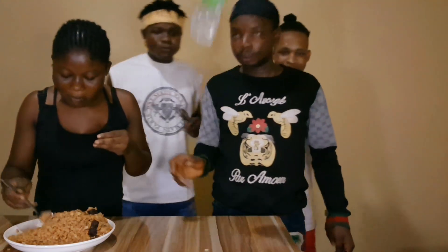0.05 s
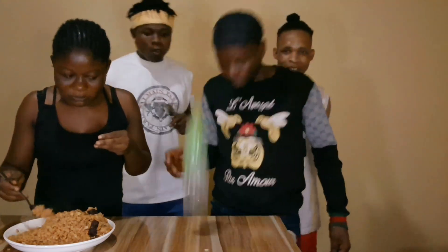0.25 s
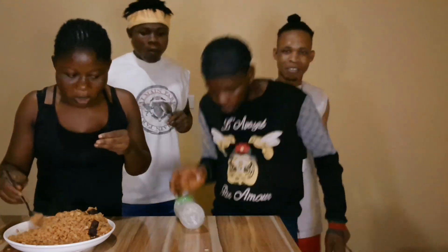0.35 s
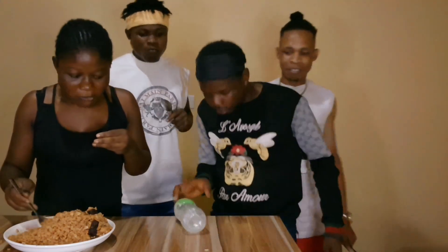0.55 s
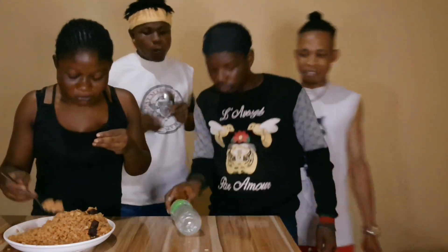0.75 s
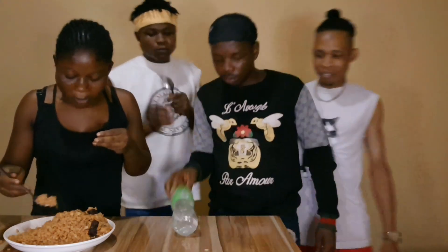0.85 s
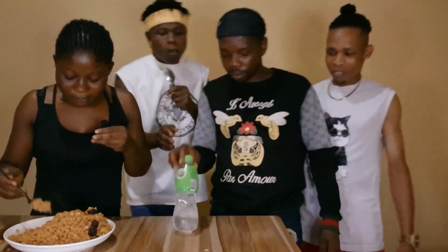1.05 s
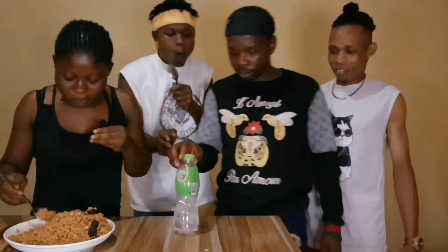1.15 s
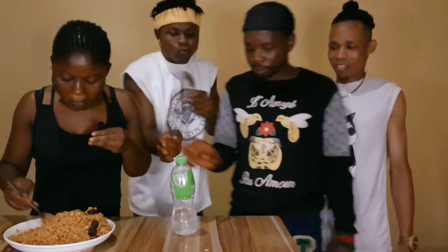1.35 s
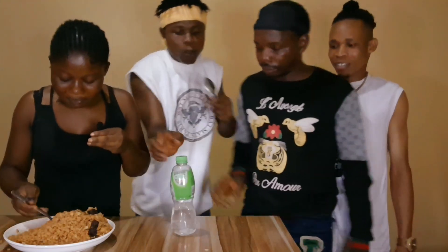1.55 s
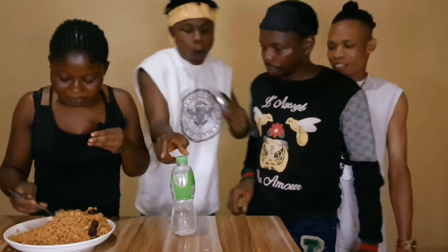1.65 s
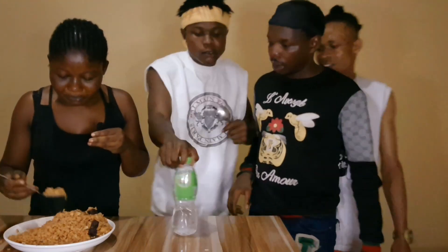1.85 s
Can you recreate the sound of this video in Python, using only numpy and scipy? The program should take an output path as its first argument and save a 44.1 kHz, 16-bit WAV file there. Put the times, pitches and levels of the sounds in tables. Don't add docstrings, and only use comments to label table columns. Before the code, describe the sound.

Plastic bottle lands with a hard cracking thud on a wooden tabletop, then softer bumps and light taps

```python
import sys
import numpy as np
from scipy import signal
from scipy.fft import rfft, irfft
from scipy.io import wavfile

SR = 44100
rng = np.random.default_rng(int(sys.argv[2]) if len(sys.argv) > 2 else 0)


def put_to_file(sound):
    columns = np.atleast_2d(sound).T
    safe = np.clip(columns, -1, 1)
    whole_steps = np.round(safe * 32767)
    wavfile.write(sys.argv[1], SR, whole_steps.astype(np.int16))


def ratio(d):
    e = np.asarray(d, float) / 20
    return 10 ** e


N = 83790
T = np.arange(N) / SR
F = np.maximum(np.fft.rfftfreq(N, 1 / SR), 1)


def level(x, db):
    return x * ratio(db) / np.sqrt(np.mean(x ** 2))


def curve(table):
    hz = [row[0] for row in table]
    values = [row[1] for row in table]
    return np.interp(np.log(F), np.log(hz), values)


def pan(db):
    return ratio(np.array([[db], [-db]]) / 2)


# pitch_hz, likeness (0-1)
LIKENESS = [(60, 1), (250, 0.87), (600, 0.5), (1200, 0.1), (4000, 0), (12000, .05)]


def noise(gain):
    like = np.clip(curve(LIKENESS), 0, 1)
    white = rfft(rng.standard_normal((2, N)))
    mid, side = white * gain * np.sqrt([1 + like, 1 - like])
    return irfft(np.array([mid + side, mid - side]), N) * pan(0.27)


def hump(hz, octaves):
    return np.exp(-2 * (np.log2(F / hz) / octaves) ** 2)


def walk(rate_hz):
    spectrum = rfft(rng.standard_normal(N)) * np.exp(-(F / rate_hz) ** 2)
    return level(irfft(spectrum, N), 0)


def ring(modes, start_s):
    t = np.maximum(T - start_s, 0)
    rise = 1 - np.exp(-t / 0.00025)
    total = 0
    for k, (hz, db, t60) in enumerate(modes):
        total = total + (-1) ** k * ratio(db - 60 * t / t60) * np.sin(2 * np.pi * hz * t)
    return rise * total


# pitch_hz, density_db (per Hz)
AIR = [(18, -57), (30, -10.5), (58, -7.5), (103, -2), (145, -15), (554, -21), (937, -30.5), (1220, -29.5),
       (16000, -44.5)]
# pitch_hz, width_hz, level_db
HUM = [(91, 5.3, -59.5), (182.4, 22, -62.5), (281, 12, -72.5), (346.2, 5.9, -68)]


def air():
    tone = 0
    for hz in 30 * 2. ** np.arange(10):
        tone = tone + noise(ratio(curve(AIR)) * hump(hz, 1)) * ratio(1.3 * walk(4))
    hum = sum(level(noise(1 / (1 + ((F - hz) / width) ** 4)), db) for hz, width, db in HUM)
    return level(tone, -56) + hum


# start_s, length_s,
# level_db, centre_hz, width_octaves
RUSTLES = [(0.094, .12, -69.5, 6480, 1.34), (0.492, 0.11, -64.5, 4880, 0.11),
           (0.643, 0.023, -63, 7800, 0.22), (0.874, 0.11, -64.5, 630, 3.7), (0.93, .12, -69, 1260, 0.26),
           (1.017, 0.1, -65.5, 3740, 2.8), (1.292, .18, -64.5, 3370, 1.8), (1.44, 0.0593, -68, 10700, 1.5),
           (1.6, .04, -70.5, 4080, 3), (1.752, .2, -67.5, 1200, 3.54), (0.447, 0.24, -63, 3600, 2.07),
           (0.706, 0.123, -67, 3770, 2.2), (1.391, .03, -65.5, 4700, 0.38), (0.32, 0.088, -43.5, 46.5, 1.4),
           (1.09, 0.067, -51, 42.3, 0.69), (1.326, .14, -62, 49, .8), (0.107, 0.11, -66.5, 2040, 1.6),
           (1.029, 0.11, -64, 990, 3), (1.19, 0.074, -65, 693, 1.6), (1.723, 0.107, -63.5, 395, 0.39)]


def rustles():
    total = 0
    for start, length, db, hz, width in RUSTLES:
        rise = 1 + np.tanh((T - start) / 0.0054)
        fall = 1 - np.tanh((T - start - length) / 0.01)
        friction = noise(hump(hz, width)) * ratio(1.2 * walk(90))
        total = total + level(friction, db) * 0.33 * rise * fall
    return total


# start_s, peak_db, pitch_hz
TICKS = [(0.1018, -46, 8000), (0.643, -36.5, 7060), (0.655, -60.5, 8000), (0.71, -50, 7640),
         (.729, -45.5, 8320), (0.741, -51, 14500), (0.786, -52, 7500), (1.385, -48, 13000),
         (1.404, -40.5, 4900), (1.4049, -41.5, 8420), (1.427, -50, 3780), (1.446, -51, 13000),
         (1.464, -51, 8400), (1.469, -43.5, 8000), (1.4695, -38.5, 13000), (1.481, -44.5, 8000),
         (1.1872, -47.5, 3220), (1.2615, -53, 3000), (1.279, -50, 3300)]


def ticks():
    t60_s = 0.003
    return sum(ring([(hz, db, t60_s), (1.25 * hz, db - 10, t60_s)], start) for start, db, hz in TICKS)


# centre_hz, level_db, t60_s
ROOM = [(112.3, -19, 1), (250, -4, 0.61), (509, 0.5, 0.54), (1170, -6, 0.56), (2110, -5, 0.42),
        (3510, -6.5, 0.49), (5050, -19, 0.34), (7800, -15.5, 0.4), (12300, -26, 0.2), (15500, -27, .42)]


def room(x):
    t = T - 0.0018
    tail = sum(level(noise(hump(hz, 0.93)), db) * ratio(-60 * t / t60) for hz, db, t60 in ROOM)
    tail = tail * np.clip(t / 0.0021, 0, 1) * ratio(-13)
    return signal.fftconvolve(x[None], tail, axes=1)[:, :N]


# start_s, blow_db, crack_db, contact_ms
BLOWS = [
    (.2098, -7, -6.5, 0.81),
    (.221, -14, -25.5, 1.17),
    (0.314, -12, -38, 3.9),
    (0.346, -13.5, -57, 4),
    (.432, -14.5, -42, 4.83),
    (.475, -24, -54, 4.15),
]
# pitch_hz, level_db, t60_s
TABLE = [(121.9, -4, 0.2), (170.7, -5, 0.18), (230, -9, 0.2), (258, -12, 0.2), (420, -2, 0.26),
         (458, -8, 0.19), (528, -3.5, 0.15), (618.7, 2.5, 0.18), (744.5, 3, 0.0785), (778.3, -6.5, 0.16),
         (941, -21, 0.27), (1200, -4.5, 0.036), (1873, 7.5, 0.057)]
# pitch_hz, level_db, t60_s
WALL = [(679, 1, 0.026), (1417, -12, 0.02), (3284, 1, 0.0088), (4052, -6, 0.0041), (4750, -12.5, .01),
        (7500, -1, 0.0046), (12500, -19, .005)]


def blows():
    push, snap = np.zeros(N), np.zeros(N)
    for start, blow_db, crack_db, contact_ms in BLOWS:
        shape = np.sin(np.pi * np.clip((T - start) / (contact_ms / 1000), 0, 1)) ** 2
        push += ratio(blow_db) * shape / shape.sum()
        snap[int(start * SR)] += ratio(crack_db)
    table = signal.fftconvolve(push, ring(TABLE, 0) / 3)[:N]
    wall = -signal.fftconvolve(snap, ring(WALL, 0))[:N]
    return table, wall, snap


# centre_hz, level_db, t60_s, width_octaves
SHIVER = [(3300, -26.5, 0.12, 0.14), (4600, -31.5, 0.096, 0.27), (8000, -34, 0.11, 0.23)]


def shiver():
    t = T - BLOWS[0][0]
    total = 0
    for hz, db, t60, width in SHIVER:
        total = total + level(noise(hump(hz, width)), db) * ratio(-60 * np.maximum(t, 0) / t60)
    return (t > 0) * total


# start_s, level_db, tilt_db (per octave)
TAPS = [
    (1.188, -41.5, -5.5),
    (1.261, -43, -4.5),
    (1.321, -44, 4.5),
]
# pitch_hz, level_db, t60_s
BASE = [(480, -2.5, 0.083), (780, -9, 0.044), (890, -10.5, 0.043), (1243, -8.5, 0.018)]


def taps():
    total = 0
    for start, db, tilt in TAPS:
        modes = [(hz, db + mode_db + tilt * np.log2(hz / 500), t60) for hz, mode_db, t60 in BASE]
        total = total + ring(modes, start)
    return total


# pitch_hz, density_db (per Hz)
SLIDE = [(35, -33.5), (60, -18), (97, -1), (273, -7), (304, -13), (533, -8.5), (643, -16.5), (800, -18.5),
         (2500, -30.5), (3250, -62), (5500, -120)]
# pitch_hz, width_hz, level_db
DRAG = [(98, 14.5, 8), (190, 23, -1.5), (289, 56, -11.5), (510, 230, -12), (819, 60, -13.5),
        (1270, 80, -24)]


def slide():
    start_s, to_full_drag_s = 1.236, 0.1
    rumble = ratio(curve(SLIDE) - 5)
    ringing = sum(ratio(db) / (1 + (2 * (F - hz) / width) ** 2) for hz, width, db in DRAG)
    grainy = noise(rumble + ringing) * ratio(1 * walk(42))
    u = np.maximum(T - start_s, 0) / to_full_drag_s
    return level(grainy, -43) * u * np.exp(0.5 - 0.5 * u ** 2)


def scene():
    table, wall, snap = blows()
    tick, tap = ticks(), taps()
    near = table * pan(2) + (wall + tick + tap) * pan(5)
    into_room = snap + ratio(-45) * table + ratio(-37) * wall + ratio(-12) * tick + ratio(-40) * tap
    wet = room(into_room) * pan(3.2)
    return near + wet + slide() + rustles() + air() + shiver()


def low_pass(x):
    return signal.sosfilt(signal.butter(12, 16460, fs=SR, output="sos"), x)


def record(dry):
    x = signal.sosfilt(signal.butter(3, 58, "high", fs=SR, output="sos"), dry)
    port_hz, port_width_hz = 8000, 570
    x = x + ratio(-11.5) * signal.lfilter(*signal.iirpeak(port_hz, port_hz / port_width_hz, fs=SR), x)
    x = np.tanh(1.278 * x) / 0.98
    x = signal.sosfilt(signal.ellip(8, 0.3, 50, 15900, fs=SR, output="sos"), x)
    return low_pass(x)


dry = scene()
out = record(dry)
put_to_file(out)
```